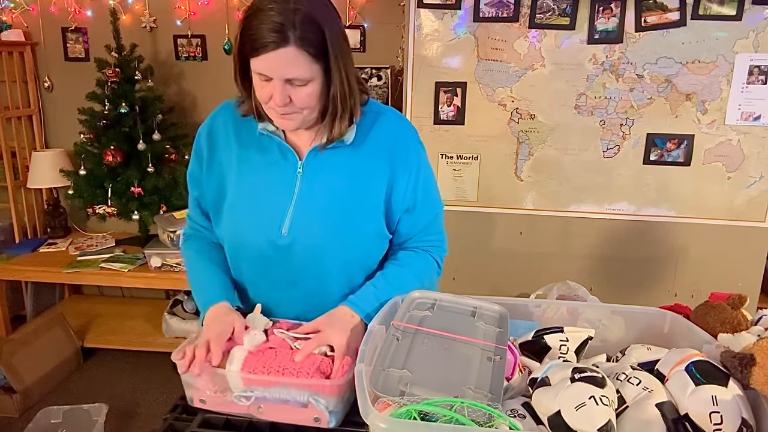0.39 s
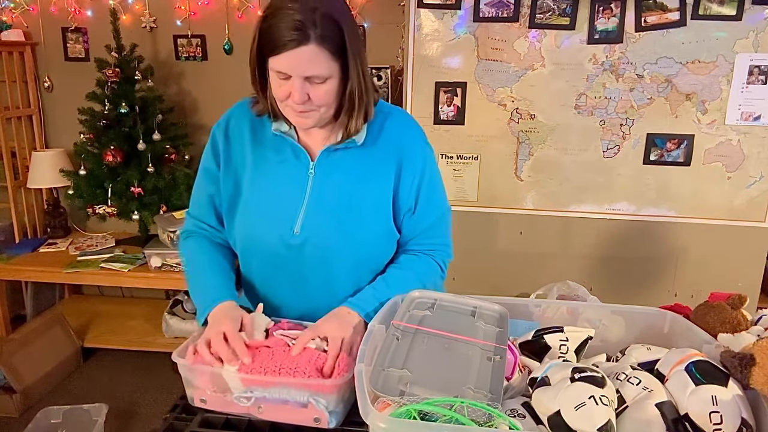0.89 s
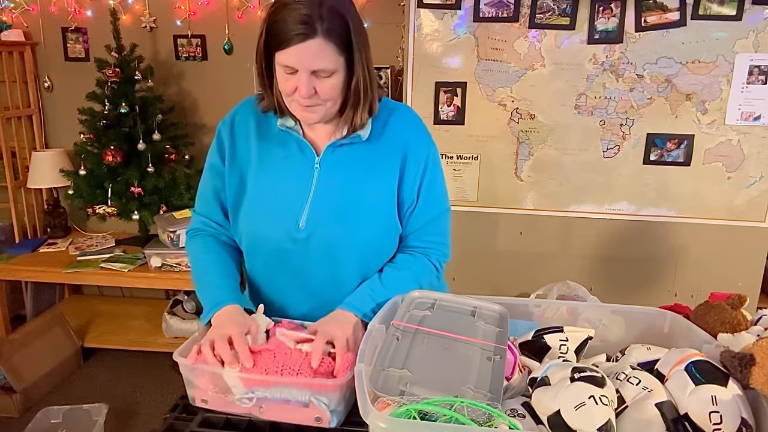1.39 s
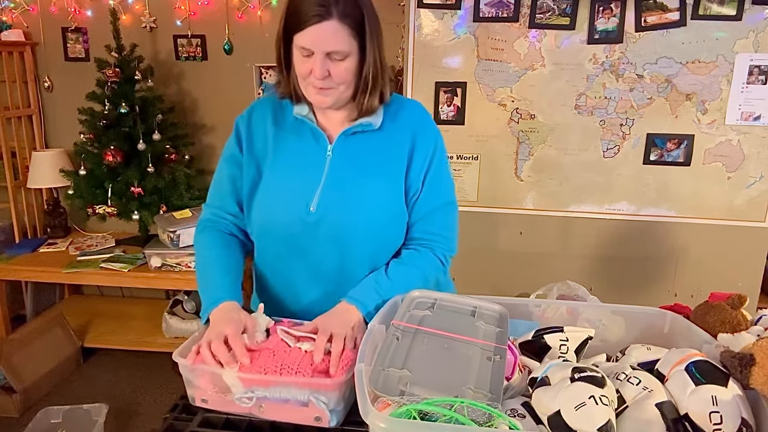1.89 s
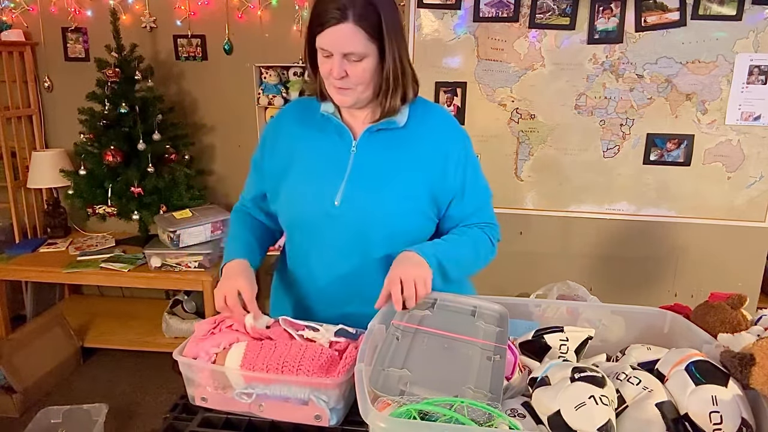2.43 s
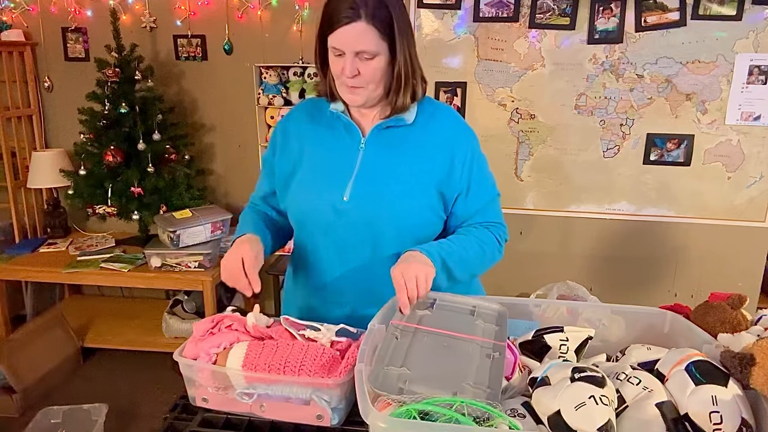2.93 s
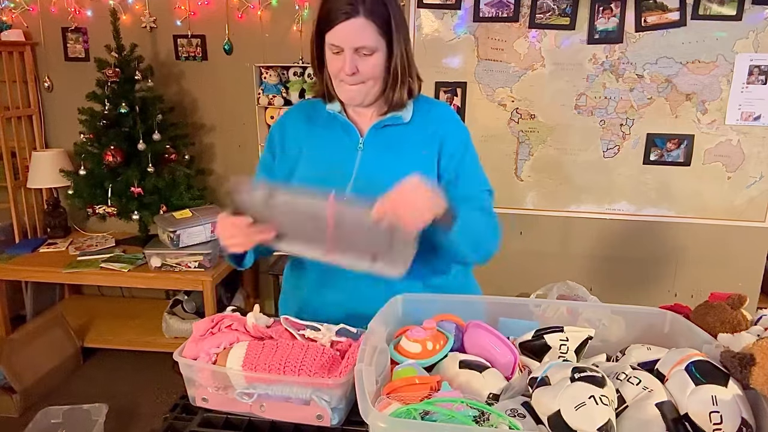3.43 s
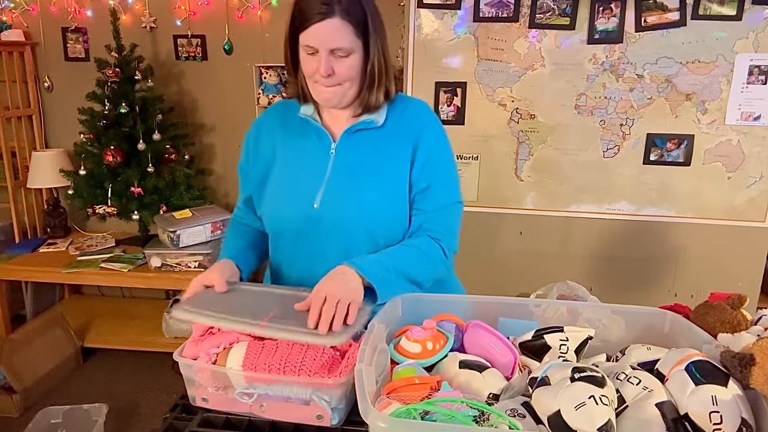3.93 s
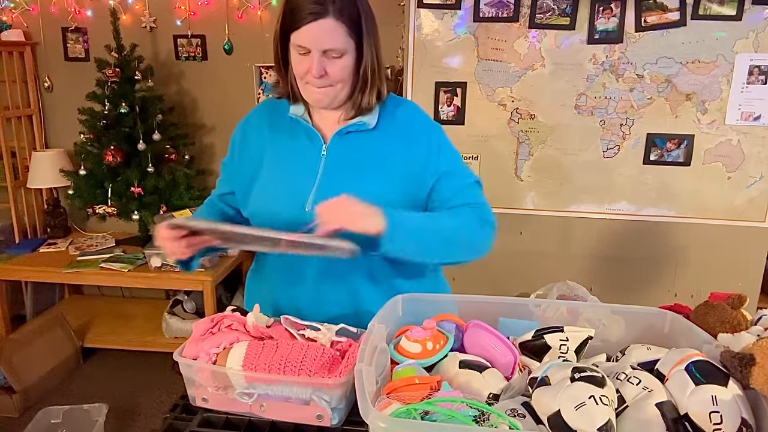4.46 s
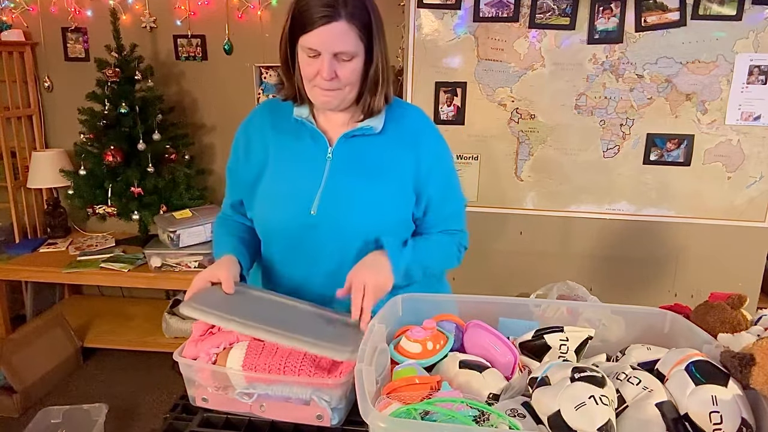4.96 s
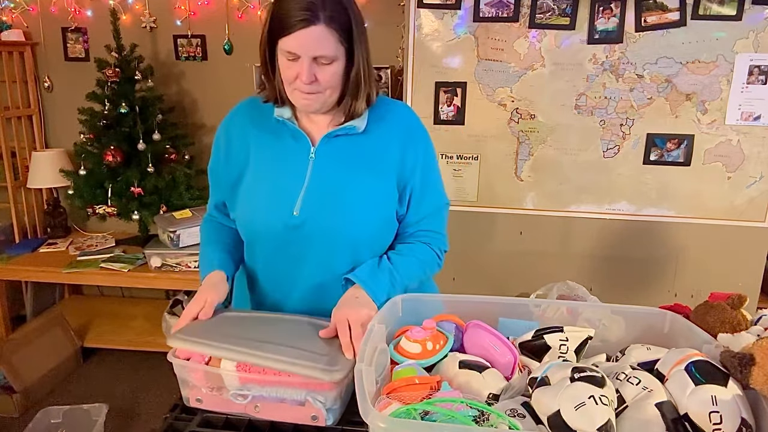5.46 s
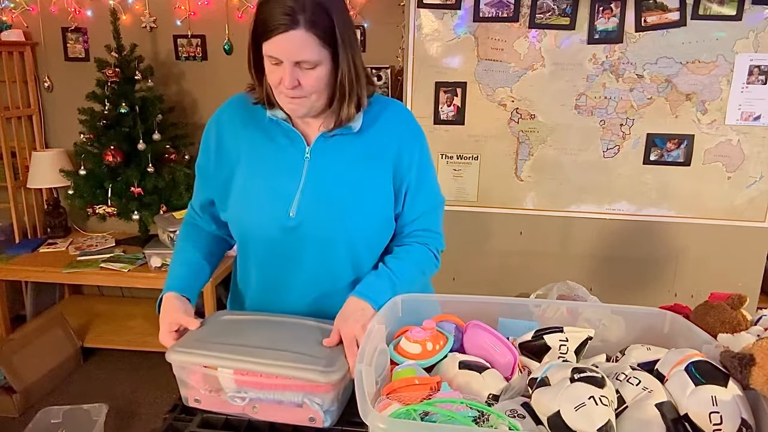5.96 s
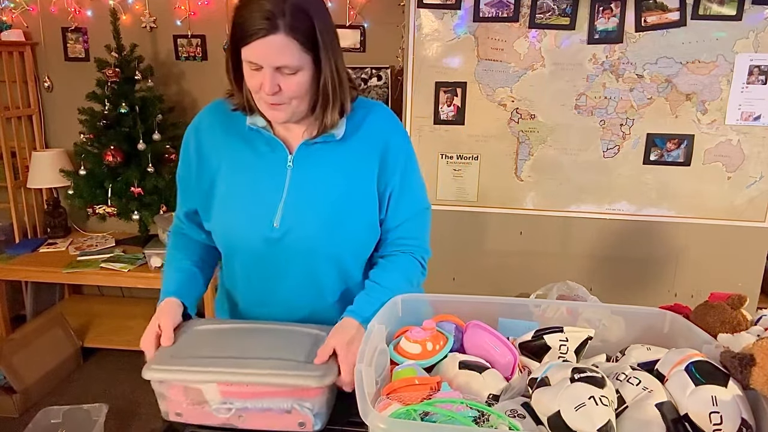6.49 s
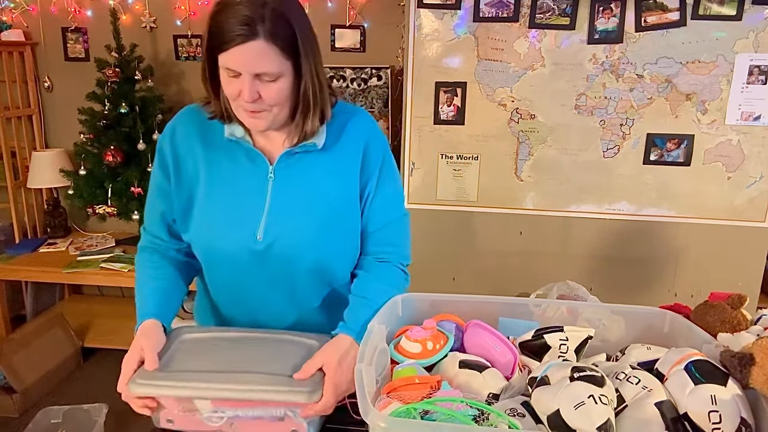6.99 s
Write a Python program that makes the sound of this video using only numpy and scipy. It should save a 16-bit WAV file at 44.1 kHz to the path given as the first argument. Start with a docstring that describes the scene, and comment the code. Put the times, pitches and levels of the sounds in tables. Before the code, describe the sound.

Very quiet crinkles and small finger taps come first, over barely audible room air. Then a thin plastic lid rattles as it is picked up and knocks onto a box. Short rubbery squeaks end in a bright snap, followed by hollow bumps, lumpy rubbing and plastic creaks as the lid is fitted, finishing with a hard sharp click. Close stereo microphones, short soft reflections.

```python
"""Hands crinkle soft goods into a plastic box on a table, fetch and lift its lid, pull a band off and snap it shut.
Every contact gives a short noisy crack and fizz through the air, and a thud along the plastic whose treble
arrives before its bass. Rubbing is a dense patter of grains with hiss and low rumble; creaks are uneven
stick-slip pulses through a resonance. A small soft room and faint air reach two close microphone ports."""
import sys
import numpy as np
from scipy import signal
from scipy.fft import rfft, irfft, next_fast_len
from scipy.io import wavfile
from scipy.ndimage import uniform_filter1d

SR = 44100
rng = np.random.default_rng(int(sys.argv[2]) if len(sys.argv) > 2 else 0)


def put_to_file(sound):
    """Save the sound as 16-bit audio at rate SR, in the file named by the first command-line argument."""
    columns = np.atleast_2d(sound).T  # one column per channel
    safe = np.clip(columns, -1, 1)
    whole_steps = np.round(safe * 32767)
    wavfile.write(sys.argv[1], SR, whole_steps.astype(np.int16))


def volts_from_decibels(level):
    """Turn decibel levels (scalar or array-like) into linear amplitude factors."""
    exponent = np.asarray(level, float) / 20
    return 10 ** exponent


N = 313992  # length in samples

# relative spectrum of the bright fizz of touch and crinkle: (f/Hz, level/dB)
FIZZ_SPECTRUM = [(900, -24), (1700, -1), (6000, 0.5), (8200, -7.5), (14000, -21.5), (15900, -30)]
GOODS_UNTIL_S = 2.3  # the hands work on soft goods, then on the hard lid
RIM_DB = -8  # rim modes over the noise of a crack, before their random spread


def read(points, hz):
    """Reads a table on a log-frequency axis."""
    f, value = np.transpose(points)
    return np.interp(np.log(hz + 1), np.log(f + 1), value)


def coloured(x, points):
    """Gives a sound the tabled spectrum with a causal minimum-phase filter, then sets its rms to 1."""
    hz = abs(np.fft.fftfreq(4096, 1 / SR))
    log_gain = np.log(volts_from_decibels(np.maximum(read(points, hz), -100)))
    taps = np.fft.ifft(np.exp(np.conj(signal.hilbert(log_gain)))).real[:2048]
    y = signal.oaconvolve(x, taps)[:len(x)]
    return y / np.sqrt(np.mean(y ** 2))


def peaked(x):
    """Scales a sound to peak 1."""
    return x / abs(x).max()


def add(mix, s, sound):
    """Mixes a sound in at time s."""
    part = mix[round(s * SR):][:len(sound)]
    part += sound[:len(part)]


def room_tone():
    """Faint steady air: coloured noise, partly shared by the ports."""
    # relative spectrum of the air: (f/Hz, level/dB)
    air_spectrum = [(24, -30), (40, 0), (115, -1), (739, -29), (2990, -33), (7050, -45), (8370, -37),
                    (14000, -41)]
    level_db = -74.5  # rms at each port
    a, b = (coloured(v, air_spectrum) for v in rng.standard_normal((2, N)))
    return volts_from_decibels(level_db) * np.array([a, 0.8 * a + 0.6 * b])


def effort():
    """Gains of scrape, fizz and rumble over time: strokes swell, hold and fade; the sliding lid joins in."""
    # separate strokes of the hands over goods, lid and band:
    # (middle/s, hold/s, scrape level/dB, fizz over scrape/dB)
    strokes = [(0.075, 0.0076, -67, -6), (0.284, 0.12, -55, -3.5), (0.492, 0.14, -62.5, -2.5),
               (0.856, 0.042, -69.5, 2), (1.637, 0.055, -73.5, 7.5), (0.996, 0.13, -68.5, -1.5),
               (1.427, 0.077, -70.5, 2), (1.98, 0.14, -71, 7.5), (2.495, 0.22, -65.5, -6.5),
               (2.7, 0.013, -62.5, -10), (2.805, 0.025, -64, -9), (3.038, 0.21, -63, 2),
               (3.41, 0.21, -74.5, 12.5), (3.629, 0.078, -54.5, -2), (3.864, 0.0041, -52, -1.5),
               (3.947, 0.1, -89, 22), (4.142, 0.037, -92, 21.5), (4.224, 0.014, -84.5, 28.5),
               (4.3, 0.0039, -46, -5), (4.42, 0.029, -53.5, 9), (4.537, 0.012, -45.5, -4)]
    # the lid slides on the rim while it is fitted: (t/s, scrape level/dB, fizz level/dB, rumble level/dB)
    sliding = [(4.85, -95, -84.5, -92), (4.99, -64, -66, -67), (5.13, -58.5, -66, -59),
               (5.44, -58, -69, -61.5), (5.55, -53, -63.5, -56.5), (5.66, -49.5, -65, -50.5),
               (5.84, -58, -66.5, -55.5), (6.05, -48, -53, -50), (6.15, -56, -68, -56.5),
               (6.247, -62, -52, -54), (6.344, -61.5, -78.5, -61), (6.425, -46.5, -54, -41.5),
               (6.5, -51.5, -56.5, -57.5), (6.6, -53.5, -55, -46.5), (6.65, -41.5, -54.5, -51),
               (6.7, -50, -55.5, -47.5), (6.83, -54.5, -60.5, -51.5), (7.048, -62.5, -58.5, -59),
               (7.12, -51, -96, -53)]
    steady_db = -81  # faint steady scrape under the whole scene
    goods_rise, lid_rise, fall = 213, 384, 278  # dB per s
    goods_rumble_db, lid_rumble_db = -6.5, -4  # rumble over scrape

    t = np.arange(N) / SR
    s, *levels = np.transpose(sliding)
    power = np.array([volts_from_decibels(np.interp(t, s, level)) ** 2 for level in levels])
    power[0] += volts_from_decibels(steady_db) ** 2
    for middle, hold, db, fizz_db in strokes:
        on_goods = middle < GOODS_UNTIL_S
        rise = goods_rise if on_goods else lid_rise
        rumble_db = goods_rumble_db if on_goods else lid_rumble_db
        early = np.maximum(middle - hold / 2 - t, 0)
        late = np.maximum(t - middle - hold / 2, 0)
        layers_db = db + np.array([[0], [fizz_db], [rumble_db]])
        power += volts_from_decibels(layers_db - rise * early - fall * late) ** 2
    return np.sqrt(power)


def patter(per_s, spread_db, smooth, grain_s, low_hz, high_hz, spots):
    """Grains of uneven size over a smooth slide; each grain rings the spot it comes from."""
    size = volts_from_decibels(spread_db * np.minimum(rng.exponential(1, N), 2))
    size = size * (rng.random(N) < per_s / SR)
    t = np.arange(2000) / SR
    grain_noise, slide_noise = rng.standard_normal((2, N))
    spot = rng.integers(0, spots, N)
    grains = np.zeros(N)
    for k, hz in enumerate(np.geomspace(low_hz, high_hz, spots)):
        envelope = signal.oaconvolve(size * (spot == k), t * np.exp(-t / grain_s))[:N]
        resonance = signal.iirpeak(hz, 2, SR)
        grains += signal.lfilter(*resonance, envelope * grain_noise) / np.sqrt(hz)
    return grains / grains.std() + smooth * slide_noise


def rubbing():
    """Scrape, crinkle, hiss and table rumble under the moving hands: grain patter and noise, each coloured."""
    # relative spectrum of the scrape: (f/Hz, level/dB)
    scrape_spectrum = [(180, -7), (300, -22), (354, 13), (660, 7.5), (1490, 8), (5000, -8.5), (6500, 4.5),
                       (11000, -120)]
    # relative spectrum of the table rumble: (f/Hz, level/dB)
    rumble_spectrum = [(24, -40.5), (40, -9.5), (215, -3), (295, -4.5), (500, -10), (700, -57.5)]
    # relative spectrum of the smooth airy hiss added to the fizz: (f/Hz, level/dB)
    hiss_spectrum = [(3000, -28), (6500, 5), (8000, -45), (11000, -5), (14000, 8), (15900, 3)]
    goods_hiss_db, lid_hiss_db = -21, -14.5  # hiss over fizz
    grip_db, grip_s = 3, 0.03  # rms swing and smoothing window of the wavering grip

    scrape_gain, fizz_gain, rumble_gain = effort()
    on_goods = np.arange(N) < GOODS_UNTIL_S * SR
    hiss_gain = volts_from_decibels(np.where(on_goods, goods_hiss_db, lid_hiss_db))
    hiss = hiss_gain * coloured(rng.standard_normal(N), hiss_spectrum)
    drag = patter(per_s=540, spread_db=5.0, smooth=0.7, grain_s=0.0039,
                  low_hz=527, high_hz=3000, spots=5)
    crinkle = patter(per_s=230, spread_db=7.5, smooth=np.where(on_goods, 0.84, 2.2), grain_s=0.0011,
                     low_hz=1700, high_hz=10400, spots=5)
    bumps = patter(per_s=45, spread_db=3, smooth=3, grain_s=0.008,
                   low_hz=70, high_hz=380, spots=4)
    # on the lid the scrape comes in lumps as the grip wavers
    grip = signal.oaconvolve(rng.standard_normal(N), np.hanning(round(grip_s * SR)), "same")
    scrape_gain = scrape_gain * volts_from_decibels(grip_db * ~on_goods * grip / grip.std())
    scrape = scrape_gain * coloured(drag, scrape_spectrum)
    rumble = rumble_gain * coloured(bumps, rumble_spectrum)
    fizz = fizz_gain * (coloured(crinkle, FIZZ_SPECTRUM) + hiss)
    return scrape + rumble + fizz


def creak(db, hz, length, per_s=280, uneven=0.55, hiss=0.11, sharp_per_s=55):
    """Stick and slip: uneven slips with hiss swell and fade through one resonance, applied twice."""
    t = np.arange(SR // 5) / SR
    jitter, noise = rng.standard_normal((2, len(t)))
    slip_rate = per_s * (1 + uneven * 10 * uniform_filter1d(jitter, size=100))
    turns = np.cumsum(slip_rate) / SR
    slips = np.diff(np.floor(turns), prepend=0) + hiss * noise
    body = signal.iirpeak(hz, sharp_per_s * length, SR)  # a longer slide sings on a narrower band
    swell = np.sin(np.pi * np.clip(t / length, 0, 1)) ** 2
    rung = signal.lfilter(*body, slips * swell)
    return volts_from_decibels(db) * peaked(signal.lfilter(*body, rung))


def contact(db, thud_db, fizz_db, hz, thud_hz=200, fizz_t60=0.018, ring_db=-9, rim_db=RIM_DB, lag_s=0.014775):
    """One touch: crack and fizz through the air, and a thud dispersed by bending waves along the plastic."""
    # modes of the lid before random detuning and level spread: (f/Hz, level/dB, t60/s)
    lid_modes = [(111.1, 2.5, 0.13), (158.6, -4.5, 0.062), (229, -3.5, 0.052), (339, -10, 0.16),
                 (530, 3, 0.038)]
    # short modes of rim and walls before random level spread: (f/Hz, level/dB, t60/s)
    rim_modes = [(620, 0.5, 0.014), (987, 2.5, 0.013), (1461, 1.5, 0.017), (1820, -1, 0.014),
                 (2283, -4.5, 0.029), (3160, -3.5, 0.016)]
    size = 8192
    t = np.arange(size) / SR
    f = np.fft.rfftfreq(size, 1 / SR) + 1
    crack_noise, fizz_noise = rng.standard_normal((2, size))

    rise = 1 - np.exp(-t * hz / 0.89)  # duller touches start softer
    band = (f / hz) / (1 - (f / hz) ** 2 + 1.6j * f / hz)
    band = band / (1 - 1j * 250 / f) / (1 + 1j * f / (4 * hz)) ** 2
    crack_t60 = 0.014 + 11.8 / hz  # duller cracks last longer
    dying = volts_from_decibels(-60 * t / crack_t60)
    rim = np.zeros(size)
    for mode_hz, level, t60 in rim_modes:
        spot, phase = rng.uniform(-1.13, 1, 2)
        rim += volts_from_decibels(4.6 * spot + level - 60 * t / t60) * np.sin(2 * np.pi * (mode_hz * t + phase))
    crack = peaked(irfft(rfft(rise * (crack_noise * dying + volts_from_decibels(rim_db) * rim)) * band))
    fizz_burst = fizz_noise * rise * volts_from_decibels(-60 * t / fizz_t60)
    fizz = peaked(irfft(rfft(fizz_burst) * volts_from_decibels(read(FIZZ_SPECTRUM, f))))
    air = crack + volts_from_decibels(fizz_db) * fizz

    # the blow and the lid modes it rings, each touch landing on a different spot
    ring = np.zeros(size)
    for mode_hz, level, t60 in lid_modes:
        spot, detune = rng.uniform(-0.91, 1, 2)
        ring += volts_from_decibels(4.5 * spot + level - 60 * t / t60) * np.sin(2 * np.pi * mode_hz * (1 + 0.17 * detune) * t)
    blow = rfft(volts_from_decibels(ring_db) * peaked(ring)) / 60 + 1
    # bending waves travel faster the higher they are: the thud sweeps downwards
    delay = lag_s * rng.uniform(0.519, 1.333) * np.minimum(100 / f, 2) ** 0.92
    sweep = np.exp(-2j * np.pi * np.cumsum(delay) * SR / size)
    soft = 1 / (1 + (f / (3 * thud_hz)) ** 4) / (1 + (0.6 * thud_hz / f) ** 4)
    thud = peaked(irfft(blow * sweep * soft))
    fade = np.clip(8 - 9 * np.arange(size) / size, 0, 1)
    return volts_from_decibels(db) * (air + volts_from_decibels(thud_db) * thud) * fade


def room(x, paths):
    """Dense reflections dying band by band; sets of paths trade places over time, so hits ring differently."""
    # decay of the small soft room: (f/Hz, t60/s, level/dB, likeness of the ports/0-1)
    decay = [(100, 0.19, 2, 0.92), (407, 0.19, -0.5, 0), (1200, 0.15, -2.5, 0), (3500, 0.17, -5, 0),
             (10300, 0.044, -1, 0)]
    out = np.zeros((2, N))
    turn = 2 * np.pi * 4.4 * np.arange(N) / SR  # 4.4 turns per s
    for k in range(paths):
        taps = rng.standard_normal((2, SR // 2)) * (np.arange(SR // 2) > 0.004 * SR)
        hz, t, (own, other) = signal.stft(taps, SR, nperseg=512)
        t60, db, same = (read([(row[0], row[c]) for row in decay], hz)[:, None] for c in (1, 2, 3))
        same = np.clip(same, 0, 1)
        both = np.array([own, same * own + np.sqrt(1 - same ** 2) * other])
        evened = np.sqrt(t60 * SR / (2 * np.log(1000)))  # long decays gain no energy
        tail = signal.istft(both * volts_from_decibels(db - 60 * t / t60) / evened, SR, nperseg=512)[1]
        share = np.sqrt(2 / paths) * np.cos(turn + np.pi * k / paths)
        out += signal.fftconvolve((x * share)[None], tail, axes=1)[:, :N]
    return out


def ports(x):
    """Sets the phase and balance between the left and right channels for box and bin sounds, each by a table
    over frequency."""
    # phase of left over right for box sounds: (f/Hz, phase/rad)
    box_phase = [(0, 0), (2400, 0.4), (11800, 6.0), (16300, 6.5)]
    # phase of left over right for bin sounds: (f/Hz, phase/rad)
    bin_phase = [(0, 0), (7320, -3.2), (10200, -1.5), (11400, -0.2), (16300, 0.0)]
    # balance of left over right: (f/Hz, level/dB)
    lean = [(60, -3.0), (380, -2.5), (2380, -1.0), (15000, 2.0)]
    # the hands reach across to the bin for the lid and bring it back: (t/s, share of the bin/0-1)
    reach = [(2.3, 0), (2.45, 1), (3.4, 1), (3.6, .35), (4.8, 0)]
    size = next_fast_len(N)
    f = np.fft.rfftfreq(size, 1 / SR)
    half = volts_from_decibels(read(lean, f) / 2)
    across = np.clip(np.interp(np.arange(N) / SR, *np.transpose(reach)), 0, 1)
    left, right = x
    shifted = 0
    for share, points in ((1 - across, box_phase), (across, bin_phase)):
        phase = np.interp(f, *np.transpose(points))
        shifted = shifted + rfft(right * share, size) * np.exp(-1j * phase)
    return irfft(np.array([rfft(left, size) * half, shifted / half]), size)[:, :N]


def scene():
    """Rubbing, ticks, knocks and creaks, direct and through the room, over the room tone."""
    # light ticks of fingers, wrapping, band and latch:
    # (t/s, crack peak level/dB, fizz over crack/dB, crack centre f/Hz)
    ticks = [(0.677, -55, -15, 2500), (0.975, -42, -27, 1560), (1.141, -47.5, -17, 1500),
             (1.21, -43.5, -27, 1820), (1.396, -50, 2, 3100), (1.419, -47, -27, 3030),
             (1.521, -51.5, 1, 1670), (1.646, -45.5, -10, 1290), (1.933, -44.5, -3, 1580),
             (1.965, -42, -3, 1950), (1.984, -36, -36, 1240), (2.143, -48.5, -2, 1480),
             (2.157, -45, -11, 2470), (2.38, -38, -32.5, 3000), (2.495, -50, 6, 930),
             (4.279, -38, -32, 670), (4.495, -31, -45, 4200), (4.541, -21.5, 1.5, 1700),
             (4.813, -55.5, 2, 1510), (4.888, -34.5, -17, 1130), (5.379, -22.5, -14, 1620),
             (6.058, -22.5, -2, 2140), (6.944, -19.5, 5.5, 1500)]
    # knocks of box and lid on table, bin and hands:
    # (t/s, crack peak level/dB, thud over crack/dB, crack centre f/Hz, thud centre f/Hz)
    knocks = [(2.405, -43.5, -5, 620, 118), (2.777, -47, -6, 830, 130), (2.878, -40.5, 0.5, 1380, 100),
              (2.939, -30, -5, 860, 204), (2.958, -30.5, -2.5, 775, 176), (3.022, -23, -1.5, 1900, 201),
              (3.053, -30, -14, 784, 134), (3.351, -39, 2, 610, 100), (3.409, -33.5, 5, 400, 275),
              (3.563, -16.5, -15.5, 740, 100), (3.567, -20, -13.5, 770, 200), (3.577, -35, -2, 603, 112),
              (3.613, -27, -9.5, 790, 100), (3.719, -33, -13.5, 730, 117.4), (3.839, -40, -4, 900, 103),
              (3.867, -36, -18.5, 1310, 110), (4.909, -31.5, -9.5, 810, 100),
              (4.945, -19.5, -15, 1220, 130), (4.961, -35.5, -1, 1200, 108), (5.149, -25, -5, 665, 297),
              (5.16, -17, -14.5, 940, 211), (5.394, -45, 8, 1090, 243), (5.567, -33.5, -4, 1000, 229),
              (5.597, -37.5, 0.5, 930, 254), (5.718, -26.5, -12, 1230, 208), (5.777, -31, -10.5, 890, 199),
              (5.897, -41.5, 11, 600, 167), (5.986, -45, 10, 910, 236), (6.011, -25.5, -8.5, 1330, 200),
              (6.267, -34.5, -1, 824, 195), (6.369, -41, -2, 1000, 202), (6.535, -39, -3, 1100, 300),
              (6.67, -36, -7, 1110, 230), (6.842, -36.5, -3, 1200, 225), (6.875, -25, -4, 760, 290),
              (6.883, -33, -7, 600, 250), (6.917, -9.5, -13.5, 1660, 227), (6.943, -8.5, -4.5, 890, 200)]
    # short creaks of plastic or rubber slipping on plastic: (t/s, peak level/dB, centre f/Hz, length/s)
    creaks = [(3.072, -50.5, 1840, 0.13), (4.191, -53.5, 1670, 0.1), (4.446, -44, 299, 0.089),
              (4.287, -32.5, 1700, 0.04), (4.29, -32, 3500, 0.028), (4.373, -34.5, 1700, 0.058),
              (4.385, -25.5, 4900, 0.029), (4.428, -28, 5970, 0.014), (5.47, -36, 1400, 0.024),
              (5.938, -32, 2210, 0.018), (6.162, -34, 4000, 0.025), (6.451, -37, 1240, 0.032),
              (6.747, -25.5, 1600, 0.043), (6.762, -32.5, 690, 0.02)]
    tick_thud_db = -33.5  # a tick hardly moves the plastic
    # knocks before crackle_until_s crackle brightly, as among crinkly goods; later ones have little fizz
    crackle_until_s, bright_fizz_db, little_fizz_db = 3.65, -6, -23
    # from seated_s the lid sits on the full box and rings less
    seated_s, free_ring_db, seated_ring_db = 6.2, 1.5, -23

    box = rubbing()
    for s, db, fizz_db, hz in ticks:
        rim_db = RIM_DB if s > GOODS_UNTIL_S else -np.inf  # soft goods ring no rim
        add(box, s, contact(db, tick_thud_db, fizz_db, hz, rim_db=rim_db))
    for s, db, thud_db, hz, thud_hz in knocks:
        fizz_db = bright_fizz_db if s < crackle_until_s else little_fizz_db
        ring_db = free_ring_db if s < seated_s else seated_ring_db
        add(box, s, contact(db, thud_db, fizz_db, hz, thud_hz, ring_db=ring_db))
    for s, db, hz, length in creaks:
        add(box, s, creak(db, hz, length))
    return ports(box + room(box, paths=3)) + room_tone()


def roll_off(x):
    """The treble ends steeply here."""
    return signal.sosfilt(signal.butter(12, 16680, fs=SR, output="sos"), x)


def record(dry):
    """Band-limits the sound at 15.9 kHz with a steep low-pass and finishes it."""
    edge = signal.firwin(255, 15900, window=("kaiser", 8), fs=SR)
    mix = signal.oaconvolve(dry, edge[None], "same")
    return roll_off(mix)


dry = scene()
out = record(dry)
put_to_file(out)
```